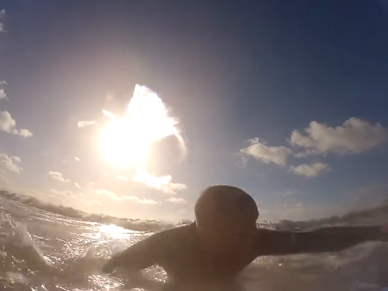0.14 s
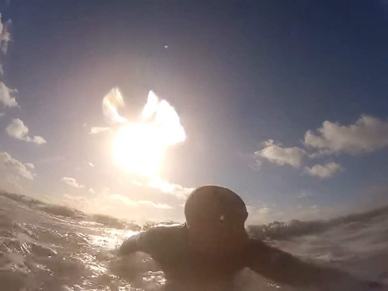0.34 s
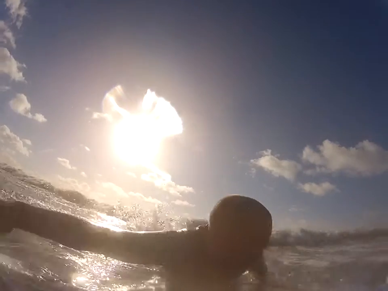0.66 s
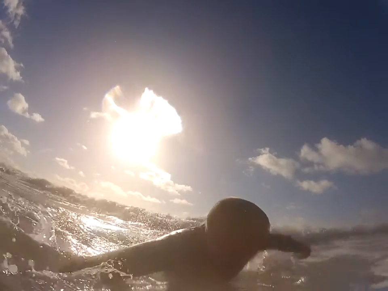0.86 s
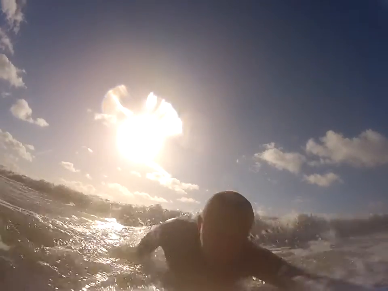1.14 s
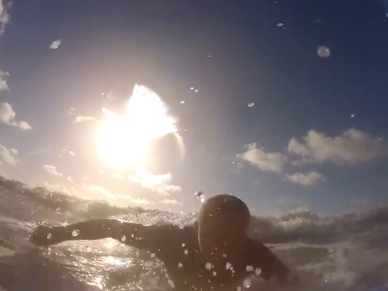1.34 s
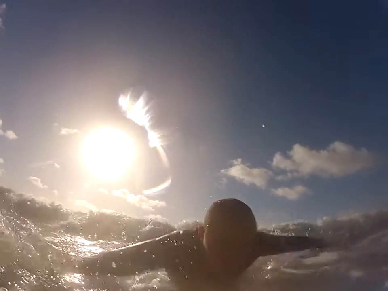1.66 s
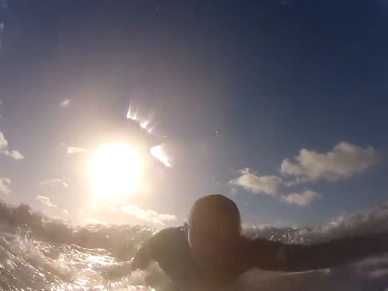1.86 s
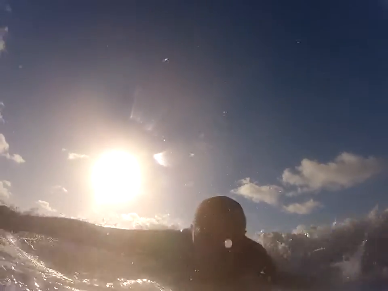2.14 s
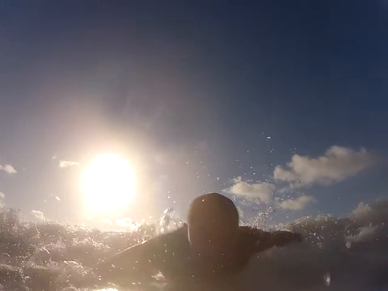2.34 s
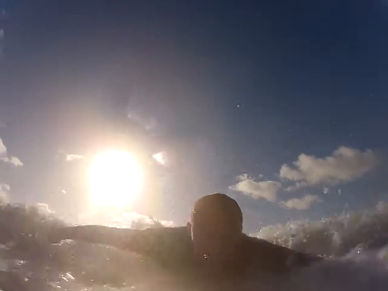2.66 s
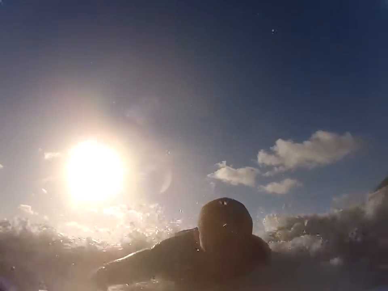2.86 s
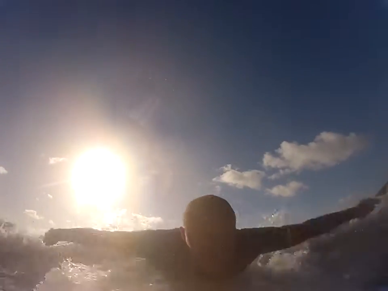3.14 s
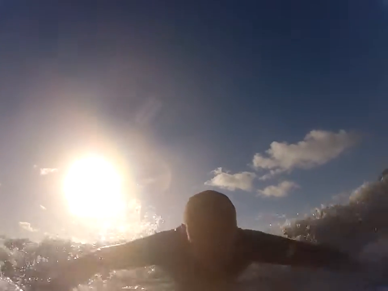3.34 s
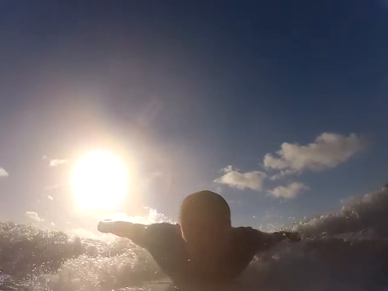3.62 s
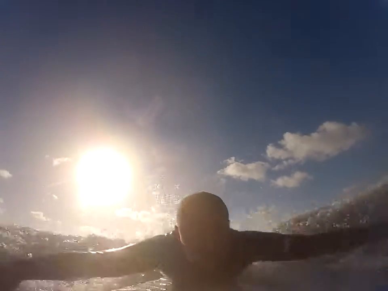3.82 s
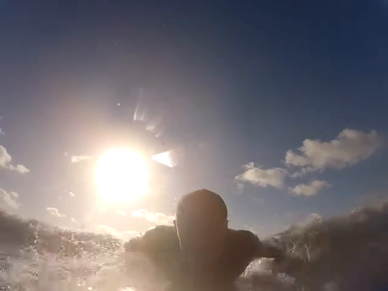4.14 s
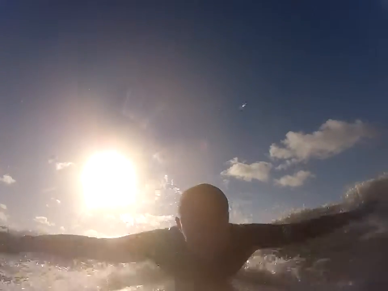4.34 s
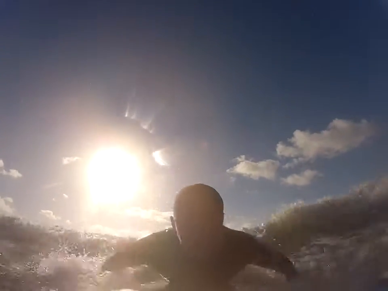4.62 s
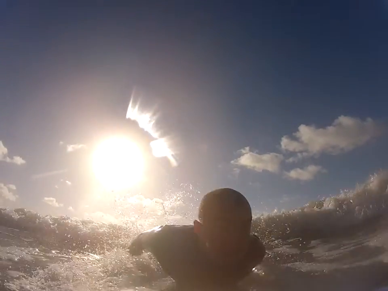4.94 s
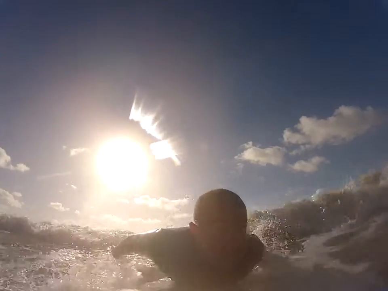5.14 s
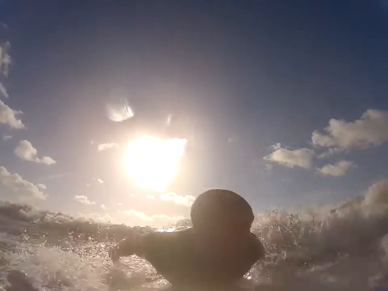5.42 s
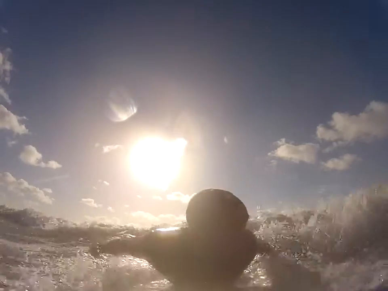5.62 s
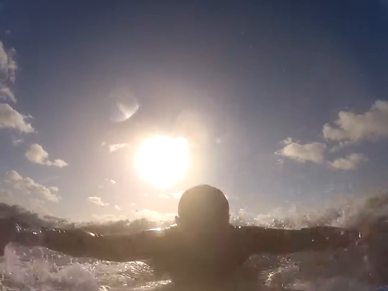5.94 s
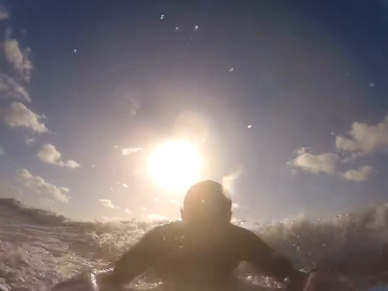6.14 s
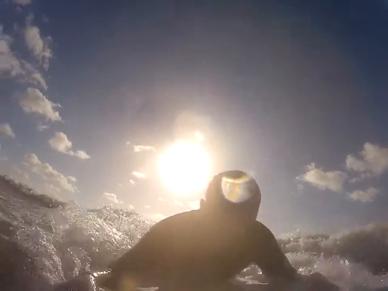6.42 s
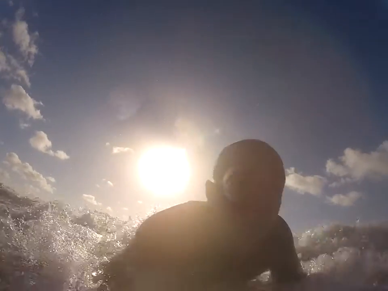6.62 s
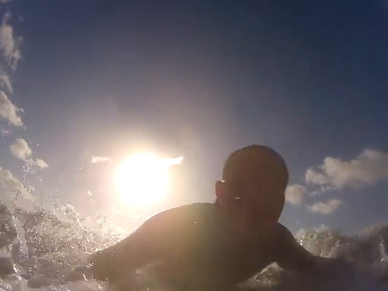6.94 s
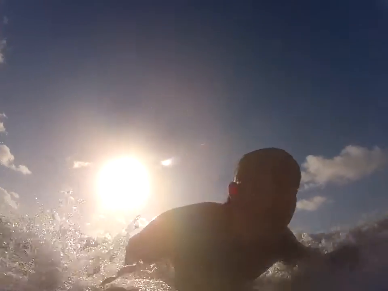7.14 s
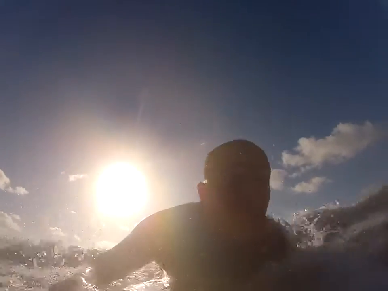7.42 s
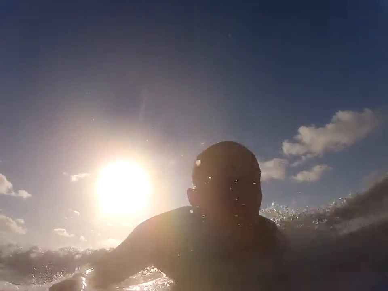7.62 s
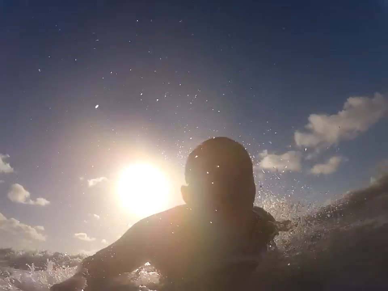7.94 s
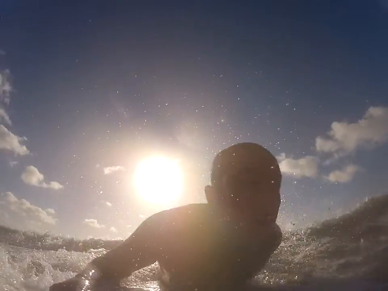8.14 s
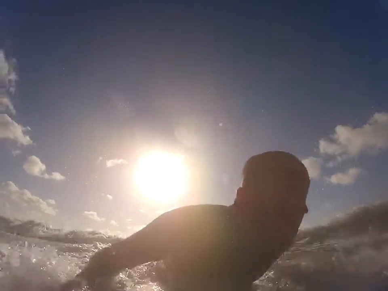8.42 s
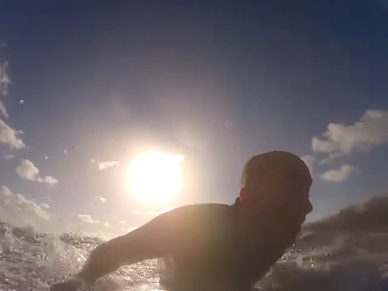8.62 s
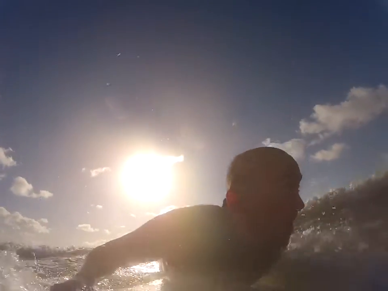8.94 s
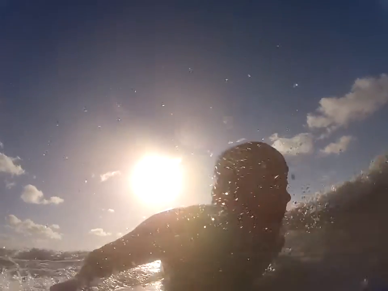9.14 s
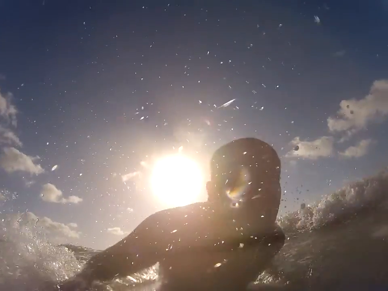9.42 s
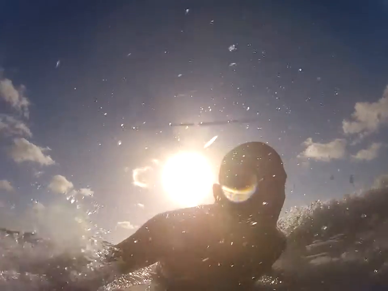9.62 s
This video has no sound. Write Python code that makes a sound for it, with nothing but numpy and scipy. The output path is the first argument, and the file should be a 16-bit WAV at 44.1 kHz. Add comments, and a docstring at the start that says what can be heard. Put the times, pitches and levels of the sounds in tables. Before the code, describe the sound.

Heard from inside a sealed case on the nose of a surfboard in breaking waves, everything is close, boxy and muffled. At first a low wavering boom near 104 Hz, soft wind rumble and thin foam hiss; light slaps at 0.3 s and two hollow hull thumps around 0.65-0.8 s. From 1 to 2.9 s it is lighter: sloshing, gurgling bubbles, a few round gulps, small surges. At 3 s white water swells strongly and stays, with a clear drop plink at 3.7 s. From 4.1 to 5.4 s hull thumps come in quick succession with drumming and gusts. Around 6.0-6.4 s a violent cluster of slaps, snaps and knocks overloads. Churning wash and booms continue, with a blow at 7.4 s; from 7.9 s sharp wet slaps multiply, densest from 8.5 s until the abrupt end near 9.8 s. A gritty digital fizz edges the water.

```python
"""A surfer paddles and catches a broken wave, heard inside a sealed case on the nose of the board.
At first the board booms at one low note (a driven mode), wind rumbles (filtered noise) and thin foam hisses
(random impacts); slaps and gulps (noise bursts, rising sines) soon join, then hollow knocks (decaying sines).
From about 3 s white water surges more strongly; bright snaps and blows on the hull crowd the later seconds.
Throughout, the case muffles the treble; the recorder clips the hardest blows and its held samples add a fizz."""
import sys
import numpy as np
from scipy import signal
from scipy.fft import rfft, irfft, next_fast_len
from scipy.io import wavfile
from scipy.ndimage import uniform_filter1d, map_coordinates

SR = 44100
rng = np.random.default_rng(int(sys.argv[2]) if len(sys.argv) > 2 else 0)


def wav_record(signal):
    """Record a signal, one row per channel, as 16-bit PCM in the file named by sys.argv[1]."""
    frames = np.transpose(np.atleast_2d(signal))
    bounded = np.clip(frames, -1, 1)
    # unit amplitude maps onto the largest positive 16-bit level
    quanta = np.round(bounded * 32767).astype(np.int16)
    wavfile.write(sys.argv[1], SR, quanta)


N = 431298  # samples

# All levels below are relative: the sources add their own trims.
# hull hits the chop: (time [s], boom level [dB], knock level against the boom column [dB])
HULL_BLOWS = [(0.648, -4.5, -17), (0.781, 1, -14), (4.139, 1, -35), (4.315, -1, -18), (4.5, 3.5, -20),
              (4.667, 0.5, -14), (4.736, -3, -11), (4.954, 1.5, -16), (5.14, -5.5, -9), (5.432, 2, -7.5),
              (6.146, -8, -4), (6.168, 3.5, -0.5), (6.239, -10, -15), (6.996, -14, -10), (7.093, -6, -4),
              (7.445, 1, -11), (8.591, -1.5, -9), (8.931, -3, -9), (9.293, -6, -7)]
# water slaps the case: (time [s], crack level [dB], heavy level against the crack column [dB])
WATER_SLAPS = [(0.172, -22.5, -13), (0.307, -8, -16), (0.338, -11, -3), (0.746, -29, 3), (0.768, -19, -6),
               (0.781, -13.5, -2.5), (1.541, -16, -22), (1.612, -18.5, -3), (1.776, -12.5, -13),
               (1.965, -17, -1), (2.572, -24, 0), (2.836, -20, 0), (3.218, -18, -12), (3.365, -12.5, -8),
               (3.424, -16, -15), (3.945, -14.5, 1), (4.465, -23, -8), (4.667, -16, 0), (5.317, -8.5, -18),
               (5.425, -13, -18), (5.443, -13, -5), (6.019, -6, -14), (6.121, -10, -13),
               (6.167, -9.5, -0.5), (6.237, -12, -12), (6.326, -18, -12), (6.377, -14.5, 1),
               (7.537, -12, -23), (7.921, -6, -6.5), (7.991, -9.5, -17), (8.171, -7.5, -20),
               (8.541, -17.5, -2), (8.609, -8, -16), (8.934, -7, -9), (9.035, -13.5, -11),
               (9.144, -6.5, -4), (9.3, -4.5, -19), (9.364, -7.5, -25), (9.626, -6, -27), (9.757, -6, -16)]
# single air pockets: (time [s], level [dB], starting pitch [Hz])
AIR_POCKETS = [(0.177, -24, 300), (1.151, -25.5, 305), (1.322, -20, 800), (1.715, -22, 276),
               (2.065, -18, 477)]
# drops that plink on the case: (time [s], level [dB], starting pitch [Hz])
DROP_PLINKS = [(0.5174, -37, 1950), (0.5364, -34.5, 3660), (0.7198, -33, 2450), (2.9794, -39, 2000),
               (3.681, -17, 1890), (6.203, -14, 1850), (6.223, -11, 1760), (9.2993, -9.5, 2050),
               (9.3104, -18, 1980)]
# brief bright cracks of noise: (time [s], level [dB])
HARD_SNAPS = [(0.307, -35), (0.5157, -35), (2.983, -25), (3.2166, -32), (3.4244, -35), (3.679, -33),
              (4.1946, -30), (4.5002, -28), (4.6745, -31), (4.7277, -29), (4.9524, -28), (5.32, -27),
              (5.4425, -17), (5.8545, -30), (6.1083, -32), (6.168, -18), (6.2382, -24), (7.5749, -29),
              (7.923, -18.5), (8.1711, -24), (8.935, -23), (9.0855, -25), (9.1604, -30), (9.3015, -23),
              (9.618, -23), (9.756, -20)]

# spectra heard inside the case, of wind, sloshing and foam: (frequency [Hz], level [dB])
RUMBLE_SPECTRUM = [(10, -45), (22, -15), (45, -5), (70, 2.5), (95, -2.5), (130, -2.5), (170, -28),
                   (300, -57)]
SLOSH_SPECTRUM = [(200, -19), (390, -10), (455, 0.5), (510, -0.5), (570, 3.5), (660, -0.5), (735, -7),
                  (800, -3), (900, -19.5), (1300, -43)]
FOAM_SPECTRUM = [(470, -27.5), (800, -6.5), (923, -3.5), (1070, 4), (1320, 2), (1600, -2), (1860, -0.5),
                 (2060, -7.5), (2430, -8.5), (2740, -19.5), (3160, -27), (3560, -21), (4500, -36),
                 (5420, -31.5), (6000, -30), (7800, -71), (13200, -120)]
# spectra of the surrounding surf, lumps of solid water and snaps: (frequency [Hz], level [dB])
SURF_SPECTRUM = [(150, 5.5), (600, 1.5), (1300, -6.5), (2000, 3), (3100, -14.5), (3600, -4.5), (4600, -21),
                 (6000, -14.5)]
LUMP_SPECTRUM = [(70, -34), (120, 9.5), (155, 2.5), (190, -2.5), (225, -3), (290, 1.5), (335, 0),
                 (400, -13), (600, -53)]
SNAP_SPECTRUM = [(600, -21), (1800, 1), (2500, 4), (3100, -4), (3600, 5), (4600, -10), (5400, -7),
                 (6200, -13)]
# resonances of the case under fine spray: (frequency [Hz], width [Hz], level [dB])
CASE_MODES = [(2470, 350, 6), (3820, 310, 2), (3840, 200, -16), (5400, 420, -0.5)]

# how fine the foam is: (time [s], treble lift [dB])
FOAM_FINENESS = [(0, 0), (1.5, 1), (2.7, 4.5), (3.2, -2.5), (4.5, -1.5), (5.2, 0.5), (6.5, 1), (8, 2.5),
                 (9.1, 1), (9.6, 4)]
# white water always about the nose, growing as the wave arrives: (time [s], foam level [dB], solid level [dB])
STEADY_WASH = [(0, -41, -39), (0.6, -43.5, -50.5), (1.45, -39.5, -43.5), (1.7, -32.5, -38),
               (2.2, -35.5, -46.5), (2.7, -29, -40), (2.98, -31.5, -38.5), (3.3, -28, -34),
               (4.1, -24.5, -37), (4.55, -31, -30.5), (4.9, -30.5, -33.5), (5.3, -25, -27.5),
               (5.58, -30, -36.5), (6.3, -27, -34), (6.9, -23, -28.5), (7.75, -25, -31.5), (8.48, -29, -35),
               (9.78, -25, -32)]
# surges over the nose: (start [s], length [s], foam level [dB], solid level [dB])
WATER_SURGES = [(0.298, 0.045, -26.5, -40), (0.75, 0.028, -34.5, -25.5), (1.108, 0.15, -33, -38.5),
                (1.526, 0.2, -31, -41), (1.879, 0.12, -26, -33), (2.197, 0.076, -30, -43),
                (2.563, 0.04, -29.5, -36), (3.02, 0.44, -24, -24), (3.51, 0.15, -22.5, -27.5),
                (3.725, 0.13, -23.5, -27), (4.175, 0.13, -23.5, -23), (4.427, 0.053, -25, -22),
                (4.62, 0.097, -28.5, -26.5), (4.918, 0.091, -22, -22), (5.11, 0.072, -22.5, -21),
                (5.406, 0.033, -19, -18), (5.623, 0.23, -23, -24.5), (5.882, 0.082, -30, -26.5),
                (6.097, 0.15, -27, -21), (6.326, 0.11, -27, -25), (6.494, 0.19, -23.5, -26.5),
                (6.742, 0.12, -22.5, -28), (6.94, 0.24, -25.5, -21), (7.354, 0.092, -27, -21),
                (7.568, 0.047, -20.5, -23.5), (8.093, 0.21, -25, -33), (8.236, 0.15, -24.5, -24),
                (8.55, 0.27, -23.5, -25), (8.802, 0.15, -24.5, -25), (9.102, 0.057, -21.5, -24.5),
                (9.285, 0.093, -28, -34), (9.472, 0.06, -22, -25), (9.736, 0.06, -20.5, -23)]
# small chop shakes the board: (time [s], boom level [dB])
SMALL_CHOP = [(0, -27), (1.1, -28), (3, -23.5), (3.5, -25), (7.4, -18.5), (7.85, -26), (8.5, -23),
              (9.78, -16.5)]
# rough water drums on the board: (start [s], length [s], boom level [dB])
ROUGH_DRUMMING = [(0, 0.15, -20.5), (0.415, 0.1, -23), (0.642, .03, -14.5), (0.796, .06, -15.5),
                  (1.195, 0.043, -17.5), (1.295, .06, -13.5), (1.656, 0.047, -15), (1.9, .22, -14.5),
                  (2.338, 0.064, -17.5), (2.545, 0.054, -13.5), (3.029, 0.435, -15), (3.624, 0.097, -12.5),
                  (3.777, .23, -13.5), (4.111, 0.254, -9), (4.378, 0.22, -11.5), (4.66, .1, -9.5),
                  (4.94, .14, -13.5), (5.13, 0.19, -11.5), (5.53, .06, -15.5), (5.65, .06, -18.5),
                  (5.802, 0.065, -13), (5.96, 0.034, -16.5), (6.214, .04, -13.5), (6.4, .06, -15),
                  (6.735, .1, -11), (6.984, 0.33, -12), (7.428, 0.047, -12), (7.993, 0.26, -14),
                  (8.265, .13, -11.5), (8.58, .25, -13), (8.915, .11, -13), (9.062, .07, -10.5),
                  (9.466, .08, -10), (9.613, 0.2, -16)]
# steady wind on the case: (time [s], rumble level [dB])
STEADY_WIND = [(0, -35), (1.45, -35.5), (3, -32.5), (3.3, -26.5), (4.6, -28.5), (5.55, -33), (6.1, -28),
               (7.4, -25), (7.8, -36), (8.1, -23.5), (9.2, -34.5), (9.78, -27.5)]
# gusts on the case: (start [s], length [s], rumble level [dB])
WIND_GUSTS = [(0.02, 0.12, -29), (0.617, 0.06, -23), (0.703, 0.19, -28), (1.862, 0.4, -30.5),
              (2.5, 0.095, -26.5), (3.063, 0.12, -23), (3.566, 0.15, -26), (4.134, 0.17, -20.5),
              (5.126, 0.08, -22), (5.41, 0.08, -24), (5.64, 0.13, -20), (5.81, 0.17, -23),
              (6.593, 0.035, -17), (7.0, 0.29, -25), (7.422, 0.07, -18), (7.538, 0.085, -21.5),
              (8.76, 0.068, -15.5), (8.9, 0.07, -20.5), (9.044, 0.11, -24), (9.27, 0.07, -20),
              (9.464, 0.16, -27)]

BOARD_HZ = 104.25  # mean pitch of the low mode of board and mount
SURGE_ATTACK_S, SURGE_T60_S = 0.034, 0.3  # rise; time to drain by 60 dB
DRUM_ATTACK_S, DRUM_T60_S = 0.027, 0.16
GUST_ATTACK_S, GUST_T60_S = 0.035, 0.19
SLOSH_SOLID_SHARE, SLOSH_DB = .35, -3.5  # share of solid water in the slosh level; offset of that level
HOLD_HZ, TOP_HZ = 12000, 15300  # rate of the held samples; upper limit of the output


def amp(db):
    """Level in decibels as an amplitude ratio."""
    return 10 ** (np.asarray(db) / 20)


def unit(x):
    """Normalization to an rms of 1."""
    return x / np.sqrt(np.mean(x ** 2) + 1e-20)


def curves(rows):
    """Linear interpolation: one value per sample for each column after the time."""
    times, *columns = np.transpose(rows)
    return [np.interp(np.arange(N) / SR, times, column) for column in columns]


def wobble(rate):
    """Band-limited fluctuation: a smooth curve through random knots, rate of them a second."""
    knots = rng.standard_normal(int(N * rate / SR) + 4)
    return map_coordinates(knots, [np.arange(N) * rate / SR])


def filtered(x, response):
    """Linear filtering: the spectrum times a complex response of frequency."""
    size = next_fast_len(N + SR // 2)
    return irfft(rfft(x, size) * response(np.fft.rfftfreq(size, 1 / SR)), size)[:N]


def coloured(x, spectrum, size=8192):
    """Minimum-phase filtering: a causal response with the gain of the (Hz, dB) points."""
    hz, db = np.transpose(spectrum)
    log_hz = np.log(np.fft.rfftfreq(size, 1 / SR) + 1)
    gain = amp(np.interp(log_hz, np.log(hz + 1), db))
    # folding the cepstrum onto positive times makes the filter causal
    cepstrum = irfft(np.log(np.maximum(gain, 1e-6)))
    cepstrum[1:size // 2] *= 2
    cepstrum[size // 2 + 1:] = 0
    impulse_response = irfft(np.exp(rfft(cepstrum)))
    return signal.fftconvolve(x, impulse_response)[:len(x)]


def resonances(x, modes):
    """Modal filtering: a sum of band-pass resonances (Hz, width Hz, dB)."""
    def response(f):
        return sum(amp(db) * 1j * f * width / (centre ** 2 - f ** 2 + 1j * f * width)
                   for centre, width, db in modes)
    return filtered(x, response)


def steadied(x, span):
    """Envelope levelling: swells slower than span seconds are evened out, rms 1."""
    power = uniform_filter1d(np.abs(signal.hilbert(x)) ** 2, int(span * SR))
    return unit(x / np.sqrt(np.abs(power) + 1e-12))


def patchy(x, depth_db):
    """Time-frequency modulation: brief patches of gain, as clouds of like-sized bubbles come and go."""
    z = signal.stft(x, nperseg=512)[2]
    field = uniform_filter1d(rng.standard_normal(z.shape), size=5, axis=0)
    field = uniform_filter1d(field, size=5, axis=1)
    return signal.istft(z * amp(depth_db * unit(field)), nperseg=512)[1][:N]


def fade(t, t60):
    """Exponential damping: a decay of 60 dB in t60 seconds."""
    return np.exp(-np.log(1000) * t / t60)


def patter(rate, spread_db):
    """Shot noise: random impacts of very unequal size, rate a second, rms 1."""
    count = int(rate * N / SR)
    sizes = amp(spread_db * np.minimum(rng.standard_normal(count), 2.5))
    sizes = sizes * rng.choice([-1, 1], count)
    return unit(np.bincount(rng.integers(0, N, count), sizes, N))


def spurts(rate, t60, depth):
    """Filtered shot noise: a gain that jumps with each small spurt of water, then drains away."""
    count = int(rate * N / SR)
    sizes = np.minimum(rng.exponential(size=count), 3)
    kicks = np.bincount(rng.integers(0, N, count), sizes, N)
    drain = fade(np.arange(SR // 4) / SR, t60)
    return 1 + depth * signal.fftconvolve(kicks, drain)[:N]


def add(track, s, sound):
    """Superposition: mix a sound into the track at s seconds."""
    start = min(max(round(s * SR), 0), N)
    track[start:start + len(sound)] += sound[:N - start]


def swells(floor, events, attack_s, t60):
    """Addition of powers: events rise, hold and die above a slow floor; a dB curve per level column."""
    t = np.arange(N) / SR
    power = amp(curves(floor)) ** 2
    for s, length, *levels_db in events:
        age = t[:int((length + t60) * SR)]
        shape = np.minimum(age / attack_s, 1) * fade(np.maximum(age - length, 0), t60)
        for track, db in zip(power, levels_db):
            add(track, s, (amp(db) * shape) ** 2)
    return 10 * np.log10(power)


def bubble(t, hz, cycles, rise):
    """Bubble resonance: an air pocket falls 60 dB in some cycles, its pitch rising as it nears the surface."""
    age = t * hz / cycles
    phase = 2 * np.pi * hz * t * (1 + rise * np.minimum(age, 2) / 2)
    return np.sin(phase) * amp(-60 * age) * (1 - np.exp(-t * hz))


def swarm(rate, centre_hz, octaves, cycles, size_db):
    """Incoherent superposition: bubbles of random pitch and size, rate a second, rms 1."""
    count = int(rate * N / SR)
    out, t = np.zeros(N), np.arange(SR // 16) / SR
    for when, pitch, size in rng.uniform(-1, 1, (count, 3)):
        ring = bubble(t, centre_hz * 2 ** (octaves * pitch), cycles, rise=0.15)
        add(out, (when + 1) / 2 * N / SR, amp(size_db * size) * ring)
    return unit(out)


def flow():
    """Common excitation: dB levels of the foam, the solid water and the sloshing that both cause."""
    foam_db, solid_db = swells(STEADY_WASH, WATER_SURGES, SURGE_ATTACK_S, SURGE_T60_S)
    slosh_db = foam_db + SLOSH_SOLID_SHARE * (solid_db - foam_db) + SLOSH_DB
    return foam_db, solid_db, slosh_db


def board(boom_db=-0.08, wander_hz=5.2, flutter_db=2.5, rock_db=1.04, t60=0.098, blow_db=-2):
    """Driven resonance: buffeting and blows keep a low mode ringing; the shifting load of water detunes it."""
    t = np.arange(SR // 2) / SR
    blows = np.zeros(N)
    for s, db, _ in HULL_BLOWS:
        onset = 1 - np.exp(-t / 0.0023)
        add(blows, s, amp(db + blow_db) * fade(t, t60) * onset)
    shake_db = swells(SMALL_CHOP, ROUGH_DRUMMING, DRUM_ATTACK_S, DRUM_T60_S)[0]
    swell_db = shake_db + boom_db + flutter_db * wobble(35) + rock_db * wobble(16)
    swell = np.sqrt(2) * amp(swell_db)  # rms level to sine peak
    pitch = BOARD_HZ + wander_hz * wobble(30)
    return np.hypot(swell, blows) * np.sin(2 * np.pi * np.cumsum(pitch) / SR)


def buffeting(solid_db, rumble_db=4, lumps_db=2.0, uneven_db=2.5):
    """Turbulent pressure and impact: wind rumbles on the case and lumps of solid water bump it."""
    pressure_db = swells(STEADY_WIND, WIND_GUSTS, GUST_ATTACK_S, GUST_T60_S)[0]
    rumble = steadied(coloured(rng.standard_normal(N), RUMBLE_SPECTRUM), span=.06)
    bumps = spurts(rate=30, t60=0.097, depth=1.0) * patter(rate=700, spread_db=3)
    lumps = steadied(coloured(bumps, LUMP_SPECTRUM), span=.06)
    lump_level = amp(solid_db + lumps_db + uneven_db * wobble(22))
    return amp(pressure_db + rumble_db) * rumble + lump_level * lumps


def white_water(slosh_db, foam_db, slosh_trim_db=-1.14, foam_trim_db=-0.17, churn_db=1.0):
    """Modulated shot noise: sloshing water and swarms of drops hit the case in shared spurts."""
    surge = spurts(rate=40, t60=.055, depth=.35) * amp(.9 * wobble(55))
    splats = surge * patter(rate=1500, spread_db=4.5)
    drops = surge * patter(rate=3500, spread_db=3)
    slosh = steadied(coloured(splats, SLOSH_SPECTRUM), span=.06)
    foam = steadied(patchy(coloured(drops, FOAM_SPECTRUM), depth_db=2.6), span=.06)
    # finer foam has more of its sound in the treble, here above about 1600 Hz
    fine = filtered(foam, lambda hz: hz ** 6 / (hz ** 6 + 1600. ** 6))
    lift_db = curves(FOAM_FINENESS)[0]
    foam = amp(lift_db) * fine + amp(-lift_db / 2) * (foam - fine)
    water = amp(slosh_db + slosh_trim_db) * slosh + amp(foam_db + foam_trim_db) * foam
    return amp(churn_db * wobble(24)) * water


def bubbles(slosh_db, foam_db, small_db=-11.5, gurgle_db=-6):
    """Size and pitch: small bubbles ring high in the foam; fewer, larger ones gurgle in the slosh."""
    small = swarm(rate=130, centre_hz=1337, octaves=0.579, cycles=35, size_db=1.5)
    gurgle = swarm(rate=35, centre_hz=610, octaves=.5, cycles=24, size_db=8)
    return amp(foam_db + small_db) * small + amp(slosh_db + gurgle_db) * gurgle


def spray(foam_db, tick_db=-58, follow=0.72, surf_db=-44, surf_follow=0.15):
    """Impulse excitation of modes: fine drops tick on the case, over surf noise that follows the foam weakly."""
    ticks = patter(rate=160, spread_db=7)
    rise_db = foam_db - foam_db.mean()
    ticking = amp(tick_db + follow * rise_db) * unit(resonances(ticks, CASE_MODES))
    hiss = unit(coloured(rng.standard_normal(N), SURF_SPECTRUM))
    return ticking + amp(surf_db + surf_follow * rise_db) * hiss


def slaps(crack_db=-1, heavy_db=2, t60=0.049):
    """Transient noise: a landing sheet of water is a short burst, part foam and part solid water."""
    out, t = np.zeros(N), np.arange(SR // 5) / SR
    strike = fade(t, t60) * (1 - np.exp(-t / .0003))
    for s, db, low_db in WATER_SLAPS:
        crack = coloured(rng.choice([-1, 1], len(t)) * strike, FOAM_SPECTRUM)
        heavy = coloured(rng.choice([-1, 1], len(t)) * strike, SLOSH_SPECTRUM)
        add(out, s, amp(db + crack_db) * crack / np.abs(crack).max())
        add(out, s, amp(db + low_db + heavy_db) * heavy / np.abs(heavy).max())
    return out


def gulps(cycles=70, level_db=-3, plink_cycles=90, plink_db=-1):
    """Free bubble oscillation: large air pockets gulp beside the board; single drops plink higher."""
    out, t = np.zeros(N), np.arange(SR // 5) / SR
    for s, db, hz in AIR_POCKETS:
        add(out, s, amp(db + level_db) * bubble(t, hz, cycles, rise=0.046))
    for s, db, hz in DROP_PLINKS:
        add(out, s, amp(db + plink_db) * bubble(t, hz, plink_cycles, rise=0.049))
    return out


def snaps(level_db=1, t60=0.014):
    """Short burst, wide spectrum: a brief bright crack of noise rides on some of the hardest moments."""
    out, t = np.zeros(N), np.arange(SR // 20) / SR
    for s, db in HARD_SNAPS:
        crack = coloured(rng.choice([-1, 1], len(t)) * fade(t, t60), SNAP_SPECTRUM)
        add(out, s, amp(db + level_db) * crack / np.abs(crack).max())
    return out


def knocks(knock_hz=295, t60=0.023):
    """Damped free vibration: each blow on the hull starts with a short hollow knock."""
    out, t = np.zeros(N), np.arange(SR // 8) / SR
    for s, db, knock_db in HULL_BLOWS:
        add(out, s, amp(db + knock_db) * np.sin(2 * np.pi * knock_hz * t) * fade(t, t60))
    return out


def scene():
    """Superposition: one flow drives the lumps, slosh, foam, bubbles and spray, over the booming board."""
    foam_db, solid_db, slosh_db = flow()
    low = board() + buffeting(solid_db) + knocks()
    water = white_water(slosh_db, foam_db) + bubbles(slosh_db, foam_db) + spray(foam_db)
    contacts = slaps() + gulps() + snaps()
    return (low + water + contacts)[None]


def record(dry):
    """Clipping and imaging: the input overloads; held samples mirror the sound around the sampling rate."""
    clipped = np.clip(dry[0], -.71, .71)
    smooth = filtered(clipped, lambda hz: 1 / np.sqrt(1 + (hz / 5600) ** 30))
    slow = signal.resample_poly(smooth, HOLD_HZ, SR)
    held = np.repeat(slow, 4)  # each slow sample is held four times
    held = signal.resample_poly(held, SR, 4 * HOLD_HZ)
    return filtered(held, lambda hz: hz < TOP_HZ)[None]


dry = scene()
out = record(dry)
wav_record(out)
```